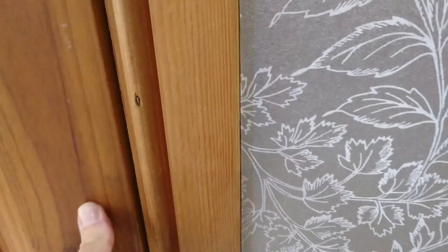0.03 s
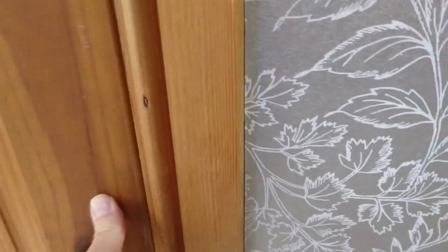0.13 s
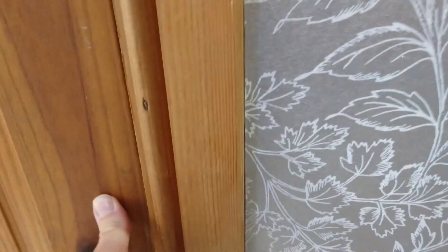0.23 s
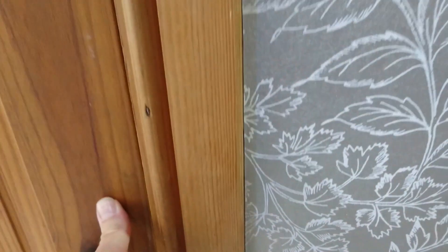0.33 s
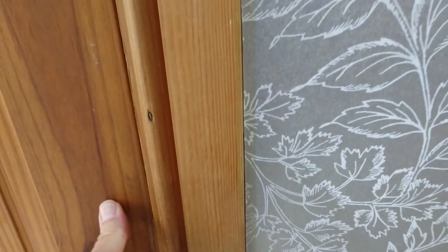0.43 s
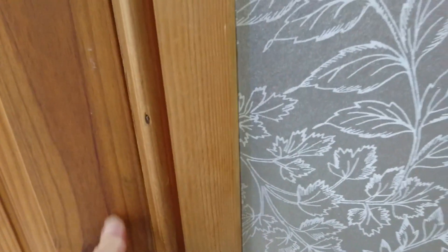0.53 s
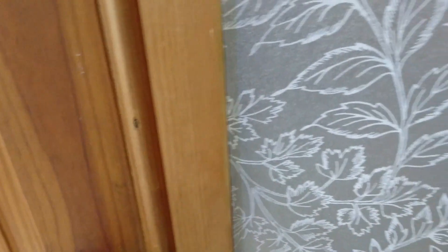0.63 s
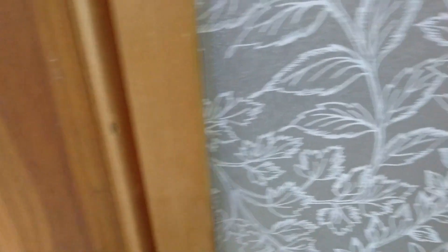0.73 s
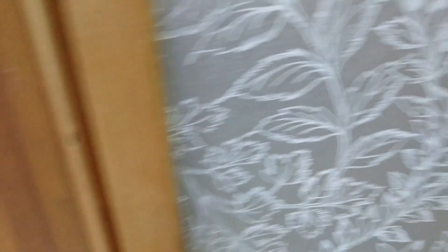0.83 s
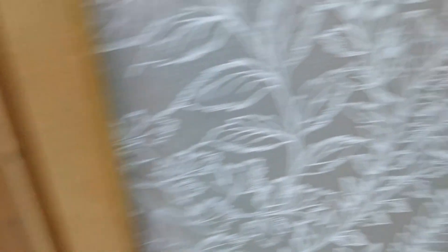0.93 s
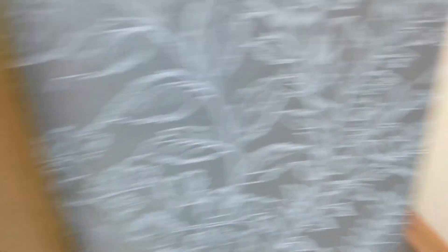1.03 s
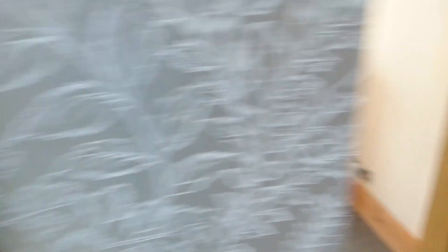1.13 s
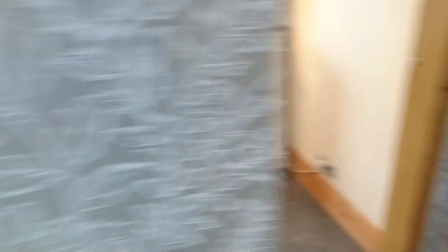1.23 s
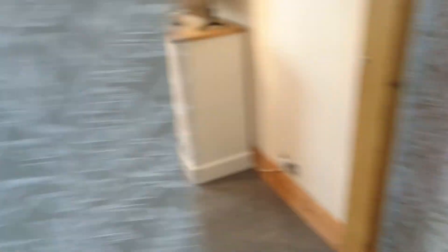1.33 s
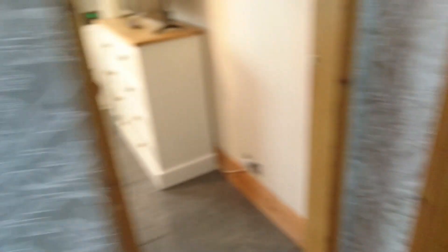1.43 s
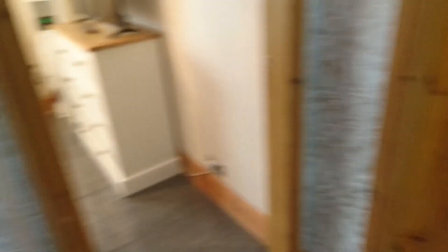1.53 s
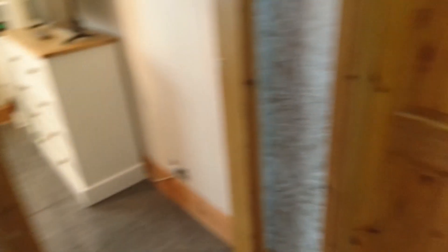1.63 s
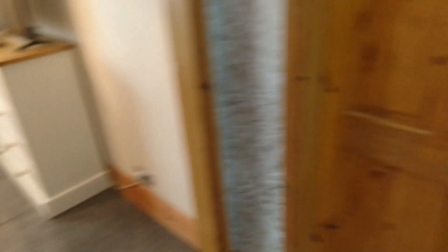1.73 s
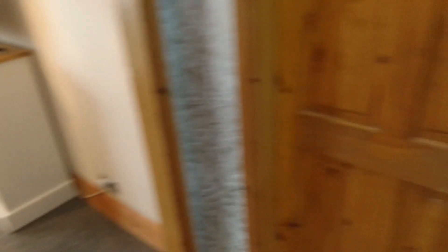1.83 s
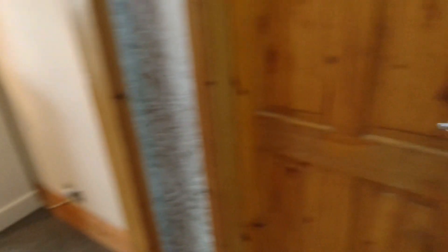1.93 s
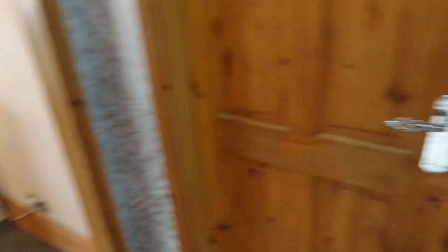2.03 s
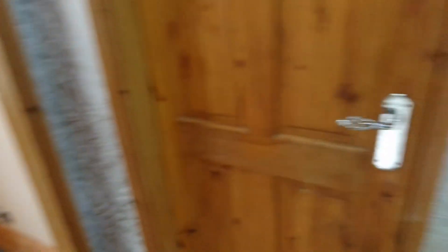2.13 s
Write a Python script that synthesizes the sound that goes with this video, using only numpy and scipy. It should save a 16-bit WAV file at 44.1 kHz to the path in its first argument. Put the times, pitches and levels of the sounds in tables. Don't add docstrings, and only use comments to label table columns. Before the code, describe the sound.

A wooden cupboard door taps its catch, then slams shut sharply in a small bare hallway

```python
import sys
import numpy as np
from scipy import signal
from scipy.fft import rfft, irfft
from scipy.io import wavfile
from scipy.ndimage import uniform_filter1d

SR = 44100
rng = np.random.default_rng(int(sys.argv[2]) if len(sys.argv) > 2 else 0)


def store_wav(level_fs):
    pcm = np.round(np.clip(np.atleast_2d(level_fs), -1, 1) * 32767)
    wavfile.write(sys.argv[1], SR, pcm.T.astype(np.int16))


def volts(x):
    e = np.asarray(x, float) / 20
    return 10 ** e


N = 97020
T = np.arange(N) / SR
PAD = 8192


def unit(x):
    return x / np.sqrt(np.mean(x ** 2))


def curve(hz, table, col=1):
    rows = np.array(table, float)
    return np.interp(np.log(hz + 1), np.log(rows[:, 0]), rows[:, col])


def colour(x, db_of):
    cepstrum = irfft(db_of(np.fft.rfftfreq(4096, 1 / SR)) * np.log(10) / 20)
    cepstrum[1:2048] *= 2
    cepstrum[2049:] = 0
    response = irfft(np.exp(rfft(cepstrum)))
    return signal.fftconvolve(x, response)[:len(x)]


def band(x, hz, width_hz):
    return signal.lfilter(*signal.iirpeak(hz, hz / width_hz, SR), x)


def narrow(hz, width_hz, db):
    once = band(rng.standard_normal(N), hz, width_hz)
    return volts(db) * unit(band(once, hz, width_hz))


def slice_weight(hz, centre, per_octave):
    return np.cos(np.pi / 2 * np.clip(per_octave * np.log2((hz + 1) / centre), -1, 1)) ** 2


def walk(rate):
    hold = int(SR / rate)
    steps = np.repeat(rng.standard_normal(N // hold + 1), hold)
    return 1.3 * uniform_filter1d(uniform_filter1d(steps, hold), hold)[:N]


def swell(start, length):
    u = np.clip((T - start) / length, 0, 1)
    return np.sin(np.pi * u ** .6)


def flow(table, flicker_db, rate):
    hz, out = np.fft.rfftfreq(N, 1 / SR), 0
    spectrum = rfft(rng.standard_normal(N)) * volts(curve(hz, table))
    for centre in 25 * 2 ** np.arange(0, 9.6, 1 / 3):
        part = irfft(spectrum * slice_weight(hz, centre, 3), N)
        out = out + part * volts(flicker_db * walk(rate))
    return unit(out)


def quiet_house():
    # frequency in Hz, level in dB per Hz.
    house_spectrum = [(30, -15), (70, -9), (200, -11), (750, -20), (1200, -10.5), (2000, -11),
                      (5000, -24.5), (15000, -17)]
    level_db = -62 + 3 * walk(2.0)
    return volts(level_db) * np.array([flow(house_spectrum, 0.92, 8) for _ in range(2)])


def duct_and_hiss():
    duct = narrow(1220, 720, -67) * np.array([[1], [-.65]])
    hiss = narrow(9850, 500, -93) * np.array([[.4], [1]])
    return duct + hiss


def port_rush():
    # frequency in Hz, level in dB per Hz.
    rush_spectrum = [(30, -39.5), (60, -14), (190, -6.5), (280, -10.5), (520, 4.5), (640, -4), (900, -23),
                     (1100, -64)]
    gust_db, flicker_db = 1, -0.5
    rush = volts(-39 + gust_db * walk(130)) * flow(rush_spectrum, flicker_db, 60)
    leak = -volts(-37) * signal.lfilter(*signal.butter(2, 600, fs=SR), rush)
    return np.array([rush, leak])


def thumps():
    # start in seconds, level in dB, pitch in Hz, right port's extra level in dB.
    thump_events = [
        (.128, -25, 81, -23),
        (1.212, -43, 60, -27),
        (2.006, -44, 55.9, -24),
    ]
    out = 0
    for start, db, hz, right_db in thump_events:
        cycles = np.maximum(T - start, 0) * hz
        swing = np.sin(2 * np.pi * cycles) * cycles * np.exp(-cycles / 0.465) * 5
        out = out + volts(db) * swing * volts(np.array([[0], [right_db]]))
    return out


def rustles():
    # start in seconds, length in seconds, level in dB, centre in Hz.
    rustle_events = [
        (.3, 1.7, -72, 2184),
        (0.501, 1.385, -75.5, 5500),
        (0.494, .25, -66, 4500),
        (1.219, 0.22, -63, 6300),
        (1.889, 0.068, -61.5, 3100),
        (1.89, 0.19, -75, 5000),
    ]
    out = np.zeros((2, N))
    for start, length, db, hz in rustle_events:
        cloth = unit(band(rng.standard_normal((2, N)), hz, 1.2 * hz))
        out += volts(db + 2 * walk(60)) * swell(start, length) * cloth
    return out


def squeaks():
    # start in seconds, length in seconds, level in dB, pitch in Hz.
    squeak_events = [
        (.598, .15, -68, 4200),
        (.6, .12, -77, 3150),
        (1.5, .3, -82, 4080),
    ]
    width_hz, flutter_db = 230, 1.5
    out = np.zeros((2, N))
    for start, length, db, hz in squeak_events:
        out += volts(db + flutter_db * walk(140)) * swell(start, length) * narrow(hz, width_hz, 0)
    return out


def ring(modes):
    t = T[:SR]
    return sum(volts(db) * np.sin(2 * np.pi * hz * t) * 1000. ** (-t / t60) for hz, db, t60 in modes)


def later_right(x):
    return np.array([x[0], np.roll(x[1], 18)])


def catch_ring():
    # frequency in Hz, level in dB, time to fall 60 dB in seconds.
    catch_modes = [(4800, -1, .010), (5200, 0, .009), (7400, -11, .008), (10000, -14, .006),
                   (12500, -14, .006)]
    touch_s, level_db = .0343, -21
    out = np.zeros((2, N + PAD))
    first = PAD + int(touch_s * SR)
    out[:, first:first + SR] = volts(level_db) * ring(catch_modes)
    return later_right(out)


def door():
    # start in seconds, panel thud in dB, wood rap in dB, catch crack in dB, contact time in ms.
    hits = [(-.09, -29, -25, -39, 2.), (0.0347, -28.5, -29.5, -34.5, 2.5), (0.043, -30.5, -36.5, -45, 2),
            (0.2274, -18, -27, -57, 5.5), (.2520, -16.5, -19, -44, 1.6), (0.2551, -14, -29, -28, 0.67),
            (0.2576, -19, -32.5, -2.5, 0.57), (.2600, -19.5, -21, -10.5, 1.2),
            (0.2633, -19.5, -31.5, -14, 1.88), (0.274, -14.5, -11, -20, 1.3), (0.286, -19.5, -19, -18, 2.7)]
    # frequency in Hz, level in dB, time to fall 60 dB in seconds.
    panel_modes = [(62, -11, .15), (79.6, -4, 0.033), (96, -6, 0.11), (132, -11, 0.11), (162.9, -3, 0.19),
                   (187.9, -8.5, 0.7), (283.8, 4, 0.042), (317.5, -11.5, .18), (397, -11.5, 0.07),
                   (441.2, -3, .07), (690, -23, 0.014), (867, -20.5, 0.031), (1020, -17.5, .04),
                   (1248, -10.5, .06)]
    rap_s, crack_rise_s, crack_s = 0.0046, 0.00013, .0015
    rap_hz, rap_width_hz, rap_top_hz = 1370, 1700, 3647
    crack_hz, crack_width_hz = 5500, 3700

    t = (np.arange(N + PAD) - PAD) / SR
    push, rap, crack = np.zeros((3, N + PAD))
    for start, thud_db, rap_db, crack_db, ms in hits:
        since, on = np.maximum(t - start, 0), t > start
        press = np.sin(np.pi * np.clip(since * 1000 / ms, 0, 1)) ** 2
        push += volts(thud_db) * press * 2000 / (ms * SR)
        rap += volts(rap_db) * on * np.exp(-since / rap_s)
        crack += volts(crack_db) * (1 - np.exp(-since / crack_rise_s)) * np.exp(-since / crack_s) * 2

    grain = rng.standard_normal((3, N + PAD))
    rap = band(rap * (grain[0] + 1.6 * grain[1:]), rap_hz, rap_width_hz) * 2
    rap = signal.lfilter(*signal.butter(4, rap_top_hz, fs=SR), rap)
    crack = band(crack * rng.standard_normal((2, N + PAD)), crack_hz, crack_width_hz) * 2
    thud = signal.fftconvolve(push, ring(panel_modes))[:N + PAD] * .5
    return thud + later_right(rap + crack)


def hall(slam, tick):
    # frequency in Hz, time to fall 60 dB in seconds, level in dB, left-right likeness from 0 to 1.
    wall_echo = [(60, .6, -8.5, 1), (110, .45, -9, 0.97), (196.1, 0.75, -5, 1), (450, 0.62, -3, 1),
                 (1230, 0.45, -0.5, .6), (2420, 0.45, -1, .2), (5000, .36, -3, .1), (9800, 0.29, 5.5, .1),
                 (14000, 0.21, -7, 0.2)]
    tail_db, build_s, tick_echo_db = 0.5, .008, -8
    t, hz = T[:SR], np.fft.rfftfreq(SR, 1 / SR)
    mid, side = rfft(rng.standard_normal((2, SR)))
    like = np.clip(curve(hz, wall_echo, col=3), 0, 1)
    shared, apart = mid * np.sqrt(1 + like), side * np.sqrt(1 - like)
    pair = np.array([shared + apart, shared - apart])
    tail = 0
    for centre in 40 * 2 ** np.arange(0, 9, .5):
        part = irfft(pair * slice_weight(hz, centre, 2), SR)
        t60 = curve(centre, wall_echo)
        level = volts(curve(centre, wall_echo, col=2)) / np.sqrt(t60 * SR / 7)
        tail = tail + part * 1000. ** (-t / t60) * level
    tail = tail * volts(tail_db) * (1 - np.exp(-t / build_s))
    wet = signal.fftconvolve(slam + volts(tick_echo_db) * tick, tail, axes=1)
    return (slam + tick + wet[:, :N + PAD])[:, PAD:]


def through_ports(air):
    # frequency in Hz, level in dB; the same for both ports.
    mic_response = [(25, -53), (50, -11.5), (100, 4.5), (7100, -7.5), (7800, -13), (11000, -20.5),
                    (15000, -29.5), (16500, -52)]
    # cavity frequency in Hz, width in Hz, boost or dip in dB.
    cavities = [
        [(614, 300, 16), (1078.7, 250, -4.5), (1900, 500, -14), (2600, 140, -1), (3710, 600, -7.5),
         (5800, 4500, 1.5), (9000, 3000, -12), (10940, 500, -13)],
        [(480, 200, -5), (770, 200, -3.5), (1399, 300, 2.5), (1550, 120, -2), (1840, 500, 2.5), (3100, 910, -5),
         (4348, 747, 2), (5600, 300, -6.5), (9600, 1500, 4), (11800, 1200, -18)],
    ]

    def heard_by(x, port):
        def response_db(f):
            bumps = sum(db * np.exp(-(2 * (f - hz) / width) ** 2) for hz, width, db in port)
            return curve(f, mic_response) + bumps
        return colour(x, response_db)

    left, right = [heard_by(x, port) for x, port in zip(air, cavities)]
    return np.array([left - 2 * band(left, 870, 590), right])


def scene():
    air = quiet_house() + rustles() + squeaks() + hall(door(), catch_ring())
    return through_ports(air) + duct_and_hiss() + port_rush() + thumps()


def band_limit(x):
    return signal.sosfilt(signal.butter(12, 16470, fs=SR, output="sos"), x)


def record(dry):
    ceiling = .8
    rounded = ceiling * np.tanh(dry / ceiling)
    ease_out = np.clip((N - np.arange(N)) / 150, 0, 1)
    return band_limit(rounded * ease_out)


dry = scene()
out = record(dry)
store_wav(out)
```